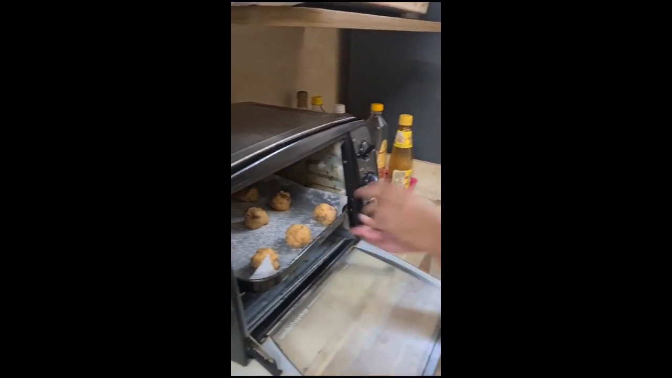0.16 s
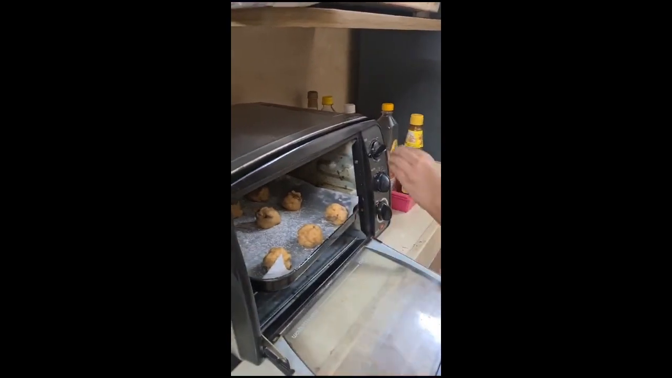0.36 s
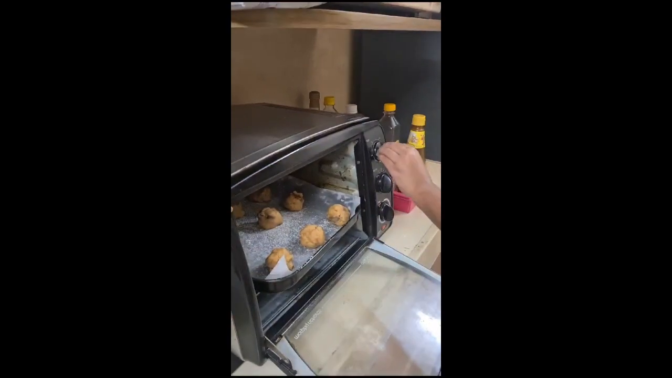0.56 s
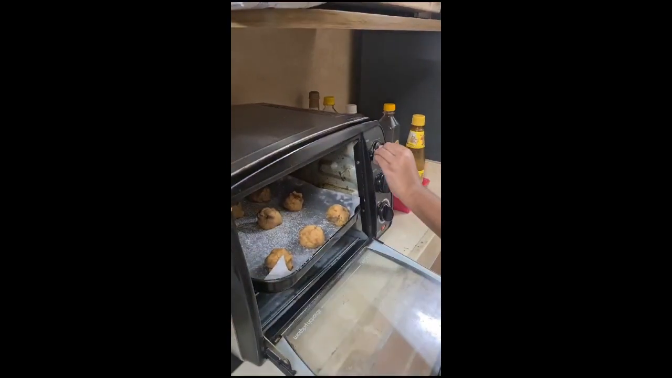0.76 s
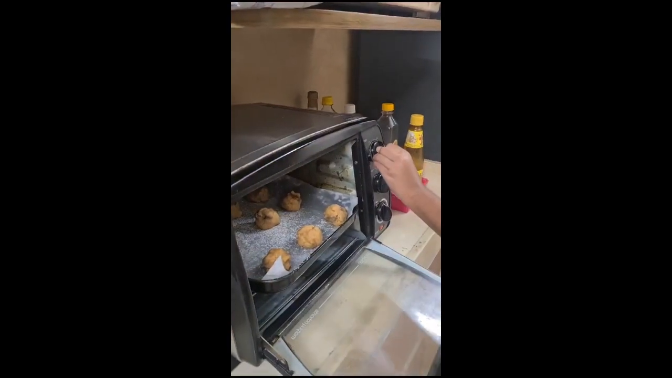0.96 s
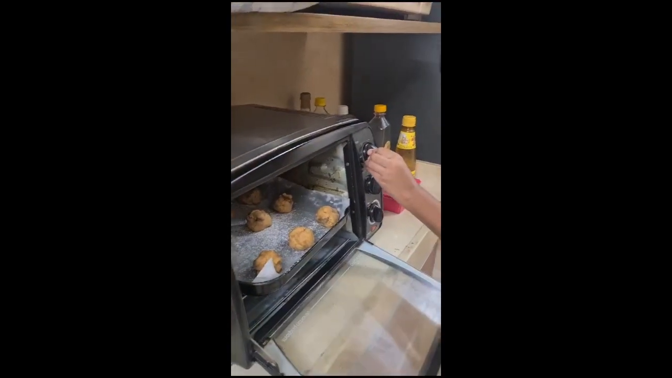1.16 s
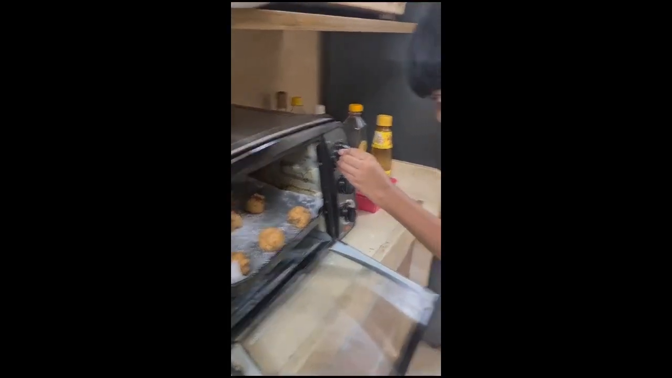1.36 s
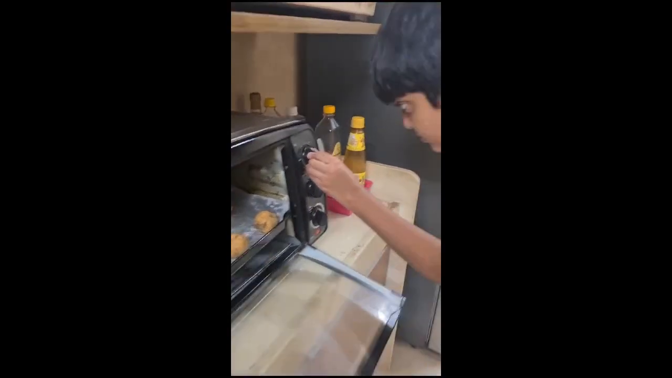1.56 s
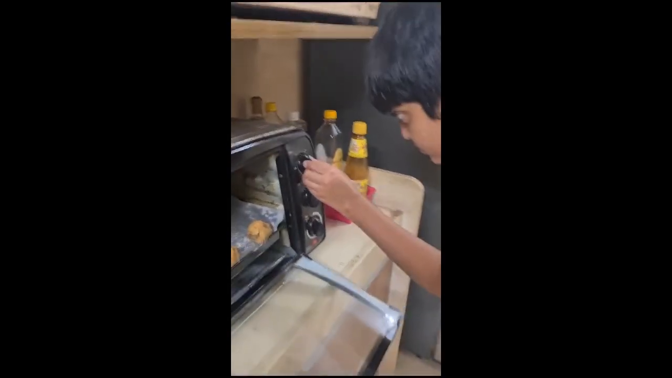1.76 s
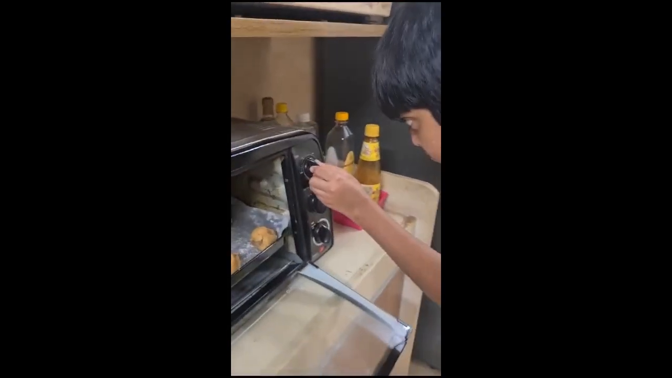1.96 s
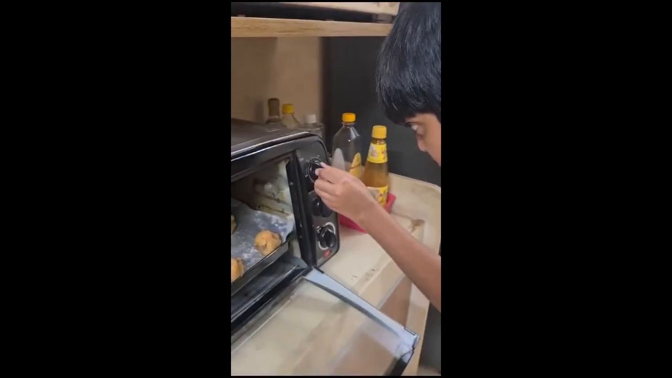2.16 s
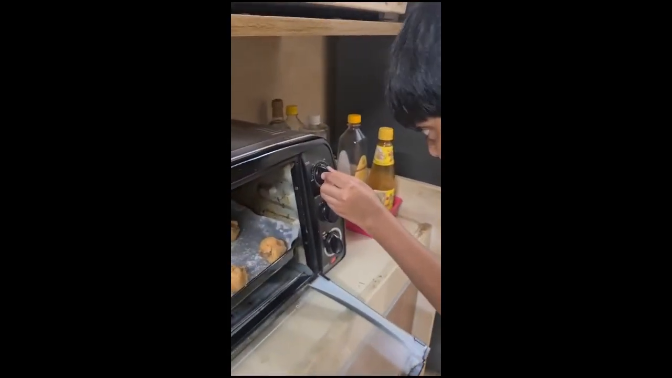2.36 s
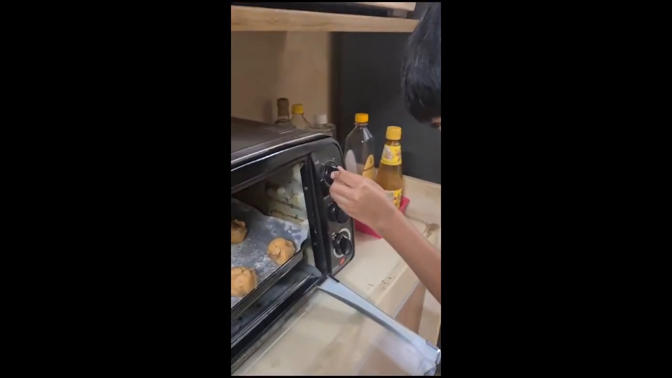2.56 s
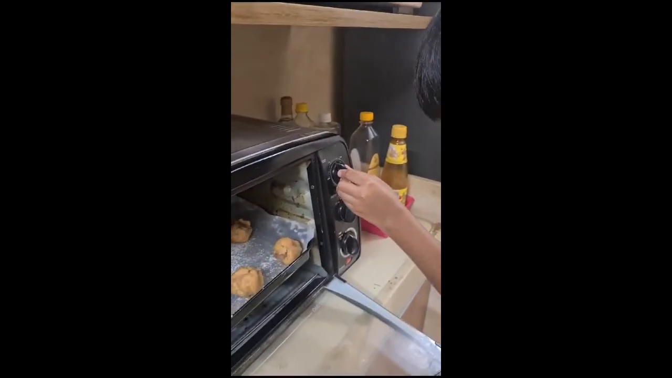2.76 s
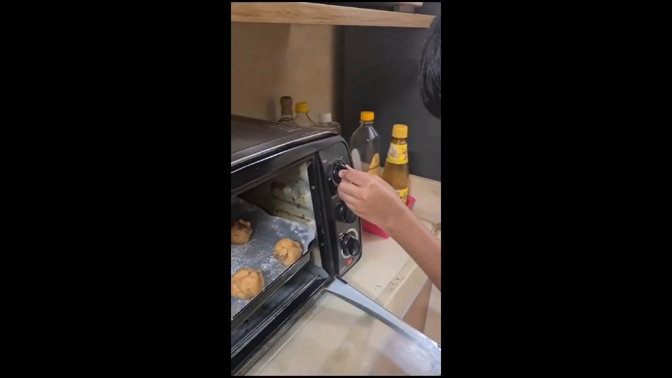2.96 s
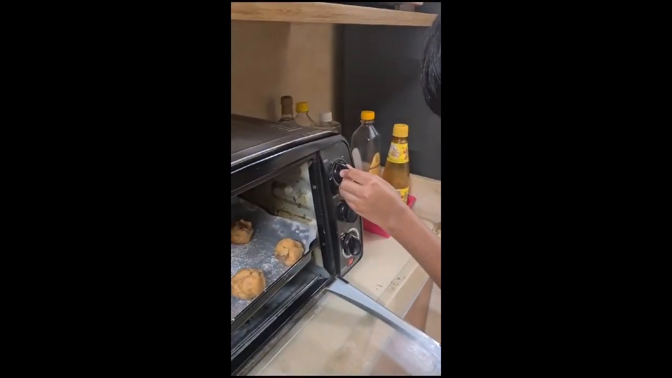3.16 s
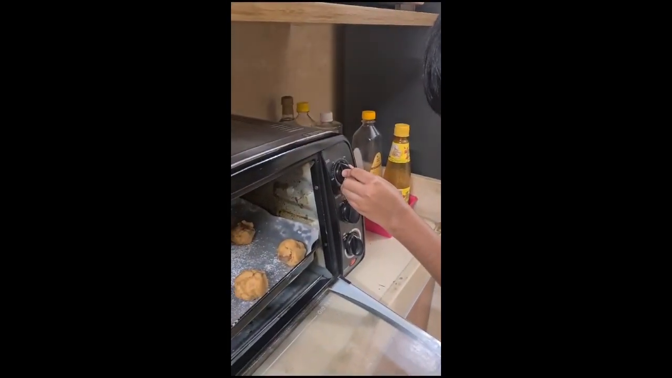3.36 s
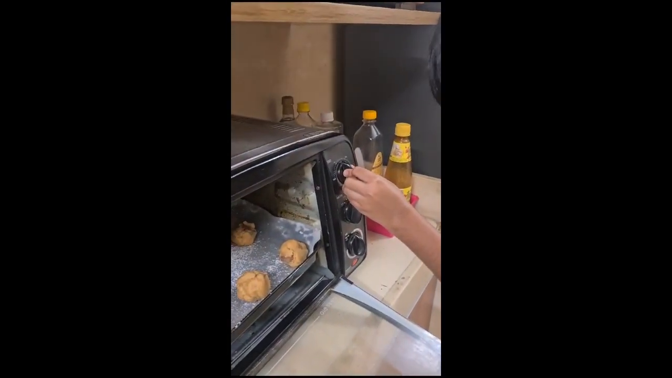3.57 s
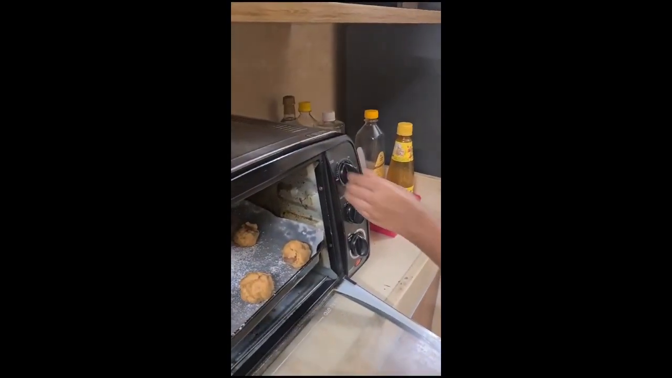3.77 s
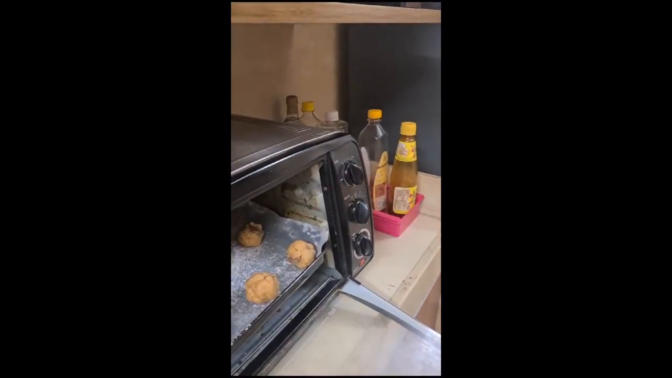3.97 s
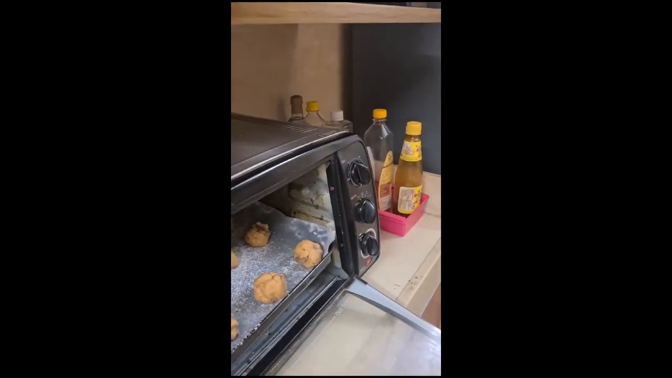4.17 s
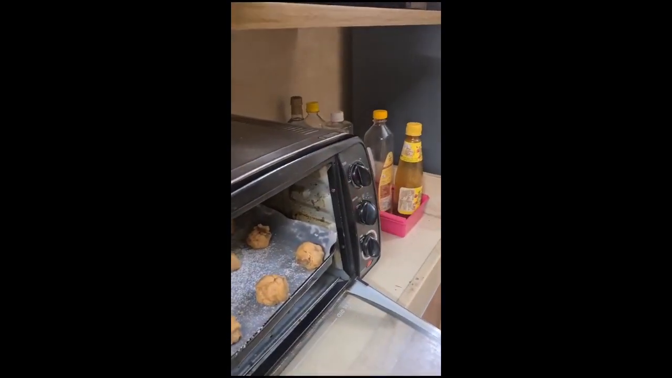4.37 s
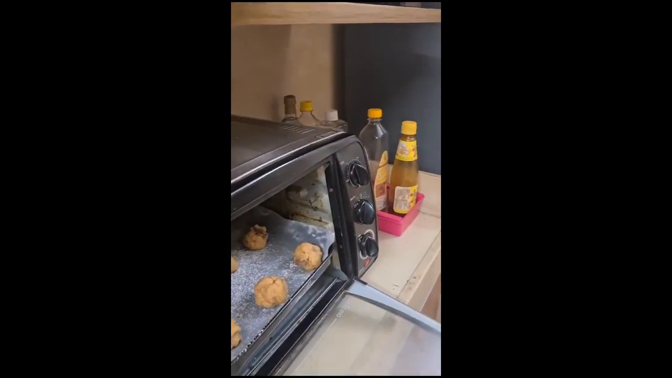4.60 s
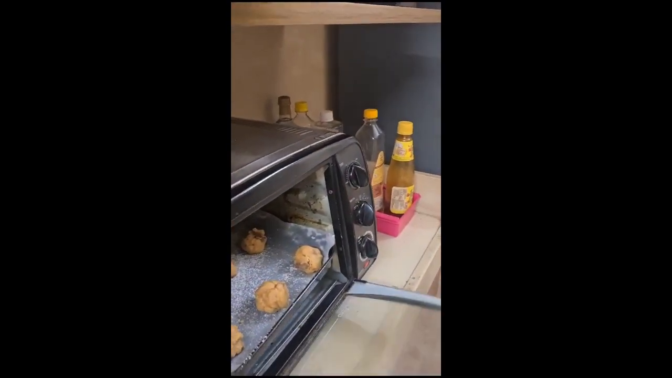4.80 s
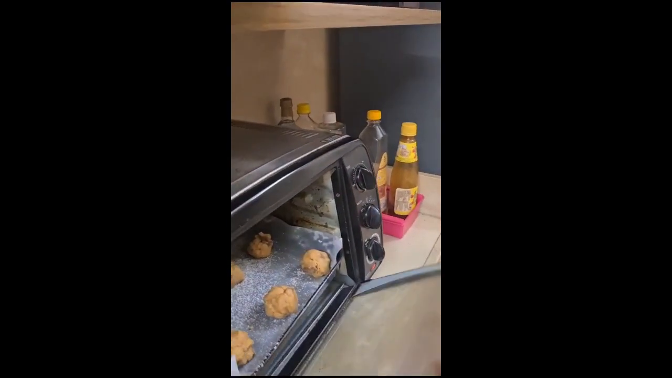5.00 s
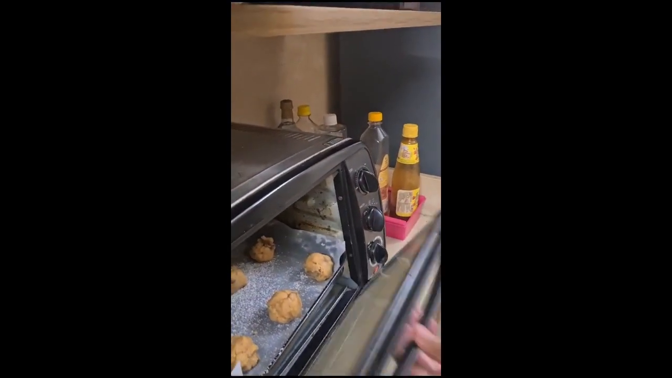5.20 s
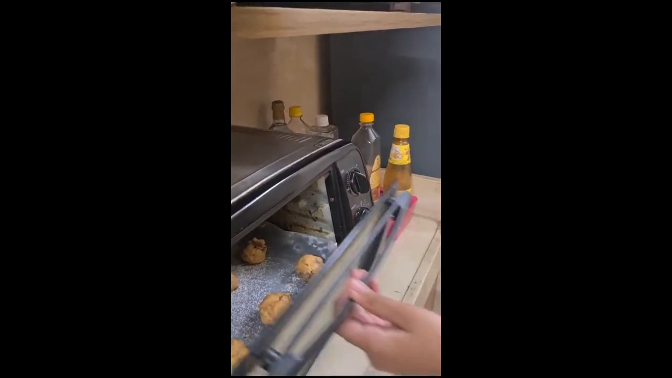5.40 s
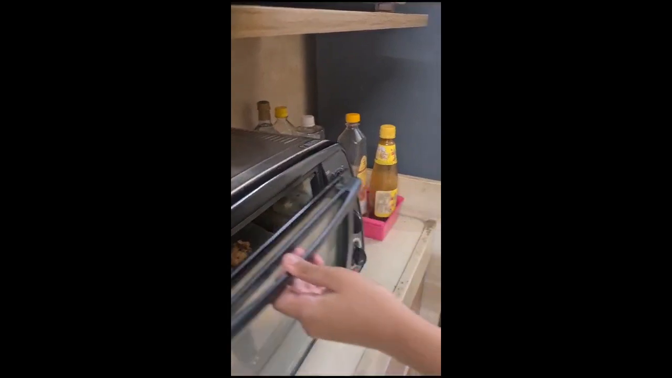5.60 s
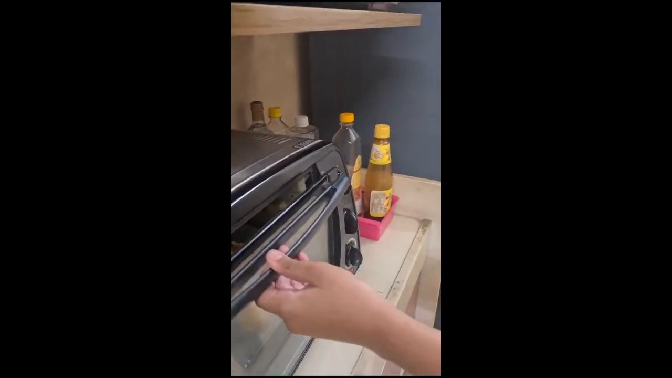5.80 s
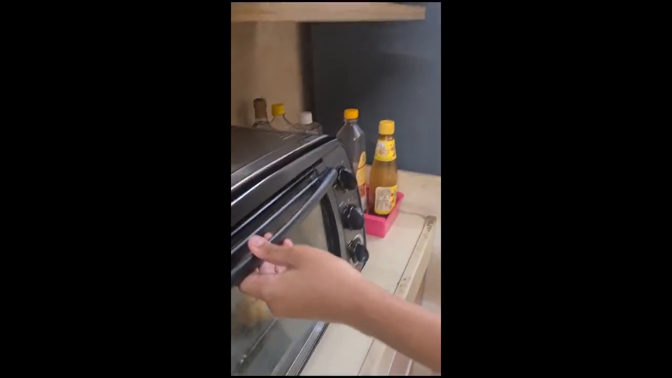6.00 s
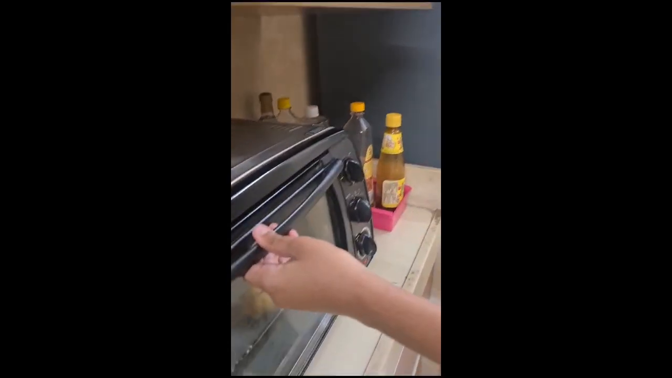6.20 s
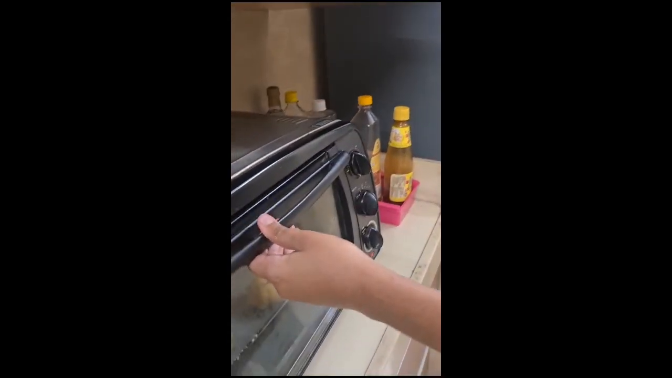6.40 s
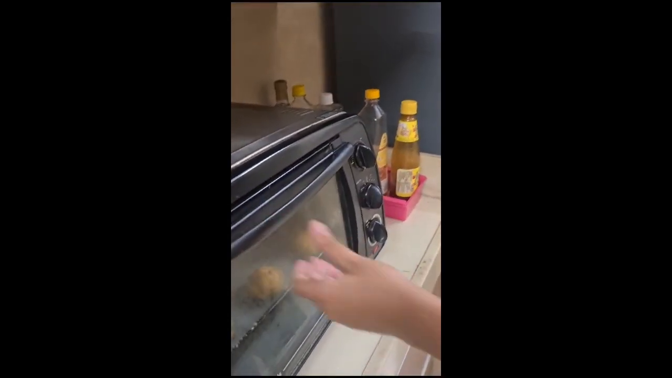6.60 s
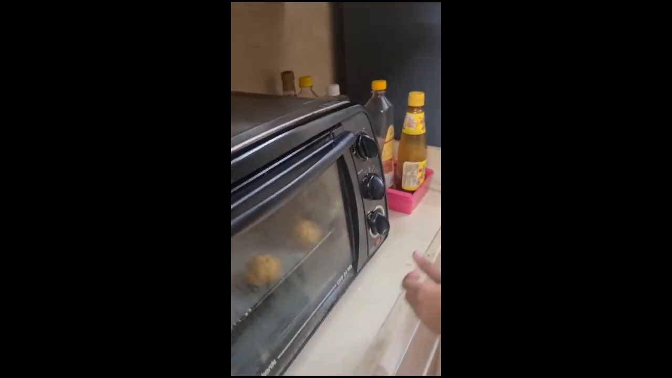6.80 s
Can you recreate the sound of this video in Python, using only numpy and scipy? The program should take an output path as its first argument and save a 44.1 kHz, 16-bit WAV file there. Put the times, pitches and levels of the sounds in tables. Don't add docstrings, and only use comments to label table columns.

```python
import sys
import numpy as np
from scipy import signal
from scipy.fft import rfft, irfft, next_fast_len
from scipy.io import wavfile
from scipy.ndimage import uniform_filter1d

SR = 44100
rng = np.random.default_rng(int(sys.argv[2]) if len(sys.argv) > 2 else 0)


def store_pcm(level_fs):
    pcm = np.round(np.clip(level_fs, -1, 1) * 32767).astype(np.int16)
    wavfile.write(sys.argv[1], SR, np.atleast_2d(pcm).T)


def volts_from_db(level):
    exponent = np.asarray(level, float) / 20
    return 10 ** exponent


N = 302085
TIME = np.arange(N) / SR
SIZE = next_fast_len(N + 4000)
HZ = np.fft.rfftfreq(SIZE, 1 / SR) + 1
PORT_LAG = 17

# start_s, peak_db, tilt_db_per_octave, t60_s, favoured_hz
TAPS = [(0.301, -43, 0, 0.055, 4930), (0.306, -42, 2, 0.15, 3160), (.315, -39.5, -7.5, 0.034, 2840),
        (0.479, -58, 4.5, 0.027, 4500), (.482, -51.5, -1, 0.27, 1270), (.63, -53, -8, 0.068, 5000),
        (1.469, -49.5, -4, 0.1, 920), (3.699, -51, -9, 0.09, 1110), (3.863, -56.5, 2, 0.047, 1460),
        (4.41, -33.5, 2.5, 0.14, 4520), (4.418, -35, 6.5, 0.025, 10500), (4.502, -31, 8, 0.0091, 7200),
        (5.357, -44.5, -5, 0.044, 6940), (6.464, -63, -4, 0.096, 3000), (6.744, -51, 5, 0.025, 3400),
        (.304, -44.5, 4, 0.31, 10400), (4.5025, -47, -4, .015, 13500)]
CLACKS = [
    (5.511, -14.5, 5, 0.05, 1280),
    (5.522, -17, -3.5, 0.057, 3050),
    (5.637, -29.5, 2.5, 0.059, 11100),
    (5.892, -38.5, -3.5, 0.74, 2280),
    (5.981, -31, -5, 0.079, 4200),
    (5.986, -17.5, -1, 0.14, 1240),
    (5.988, -32.5, 10, 0.04, 9600),
    (6.035, -32, -4, 0.12, 1240),
    (6.1, -40.5, -6, 0.048, 1350),
]
# time_s, friction_db
LIFTING = [
    (4.6, -87),
    (4.69, -72),
    (4.79, -79),
    (5.06, -75),
    (5.12, -70.5),
    (5.3, -78.5),
    (5.365, -72),
    (5.47, -77.5),
    (5.5, -64),
]


def rms_one(x):
    return x / np.sqrt(np.mean(x ** 2) + 1e-20)


def in_time(rows):
    return np.interp(TIME, *np.transpose(rows), left=-150, right=-150)


def at_hz(points, hz):
    table = np.array(points)
    return np.interp(np.log(hz), np.log(table[:, 0]), table[:, 1])


def filtered(x, response):
    padded = np.concatenate([x[..., 2000:0:-1], x, x[..., :-2001:-1]], axis=-1)
    return irfft(rfft(padded, SIZE) * response, SIZE)[..., 2000:N + 2000]


def drift(rate):
    r = np.exp(-80 * np.pi * rate / SR)
    noise = rng.standard_normal(N // 40 + 2002)
    slow = signal.lfilter([1], [1, -2 * r, r * r], noise)[2000:]
    return np.interp(np.arange(N) / 40, np.arange(len(slow)), rms_one(slow))


def ring(clicks, hz, t60):
    r, w = volts_from_db(-60 / (t60 * SR)), 2 * np.pi * hz / SR
    return signal.lfilter([0, np.sin(w)], [1, -2 * r * np.cos(w), r * r], clicks + 1e-18)


def stroke(start, held, db, attack, fade_db_per_s):
    age = TIME - start
    fading_db = db - fade_db_per_s * np.maximum(age - held, 0)
    return volts_from_db(2 * fading_db) * np.clip(1 + age / attack, 0, 1) ** 4


def swings(rows):
    out, age = np.zeros(N + SR), TIME[:SR // 2]
    for s, db, hz, t60 in rows:
        level = volts_from_db(db + 3 - 60 * age / t60)
        build = 1 - np.exp(-age * hz * 3)
        close = np.clip(10 - 20 * age, 0, 1)
        out[int(s * SR):][:len(age)] -= level * build * np.sin(2 * np.pi * hz * age) * close
    return out[:N]


def struck(modes, blows, level_db, shorten):
    out, touches = np.zeros(N), np.arange(12)
    for hz, mode_db, t60 in modes:
        clicks = np.zeros(N)
        chances = rng.standard_normal((len(blows), 12))
        for (s, db, *_), chance in zip(blows, chances):
            touch_db = db + mode_db + level_db - 2.56 * touches
            clicks[int(s * SR) + 13 * touches ** 2] += volts_from_db(touch_db) * chance / 2
        out += ring(clicks, hz, min(t60, .45) * shorten)
    return out


def banded(gain_at, count):
    # pitch_hz, likeness (0 to 1)
    likeness = [(40, 0.41), (150, 0.6), (400, 0.55), (1000, 0.022), (4000, 0.044), (12000, 0.081)]
    out, edges = np.zeros((2, N)), 22 * 2 ** np.arange(0, 9.6, 1 / 3)[-count:]
    white = rng.standard_normal((2, 2, N + 4000))
    for k, (low, high) in enumerate(zip(edges, edges[1:])):
        hz = np.sqrt(low * high)
        alike = np.clip(at_hz(likeness, hz), 0, 1)
        common, apart = np.sqrt(1 + alike), np.sqrt(1 - alike)
        pair = np.array([[common, apart], [common, -apart]]) @ white[k % 2]
        band = signal.butter(2, [low, high], "band", fs=SR, output="sos")
        out += gain_at(hz) * signal.sosfilt(band, pair)[:, 4000:]
    return out


def far_ports(x):
    # pitch_hz, left_minus_right_db
    balance = [(28, -11.5), (60, -13.5), (150, -2.5), (380, 0.5), (950, 3), (2380, 9), (5980, 5.5),
               (15000, -3)]
    colour = volts_from_db(at_hz(balance, HZ) / 2 * np.array([[1], [-1]]))
    lag = np.exp(-2j * np.pi * HZ * np.array([[0], [PORT_LAG]]) / SR)
    return filtered(x, colour * lag)


def room_tone():
    # pitch_hz, level_db (per Hz)
    colour = [(22, -5), (46, 1), (66, -6.5), (102, -4), (200, -16), (350, -20), (450, -26), (950, -28.5),
              (1500, -39.5), (2400, -50), (5000, -54.5), (6200, -52.5), (9000, -58), (15500, -62)]
    # pitch_hz, width_hz, level_db
    hum = [
        (100.04, 3.5, -54),
        (151.6, 19.3, -58),
        (249.2, 3.5, -64.5),
        (350, 8.5, -65),
        (409.4, 48, -69.5),
        (1000, 6.9, -81),
        (1863, 81, -86.5),
        (6060, 91, -88),
    ]
    # time_s, deep_rumble_db
    hand = [(0, 3), (.3, 0), (1.0, 3), (1.8, 1.5), (2.8, -3), (3.3, 1), (3.65, -7.5), (4.4, -1.5),
            (5.6, 3.5), (5.95, 5), (6.85, 2.5)]
    # start_s, level_db (over the room tone), fading_db_per_s
    booms = [
        (0.308, 8, 36),
        (4.4, 6.5, 10),
        (5.535, 15, 47),
        (5.8, 2.5, 11),
        (5.985, 17, 75),
        (6.2, 8, 11.5),
    ]
    deep = in_time(hand)
    boom = 10 * np.log10(1 + sum(stroke(s, 0, db, .022, fade) for s, db, fade in booms))

    def gain_at(hz):
        swell = deep if hz < 70 else boom * np.clip(np.log2(900 / hz) / 2, 0, 1)
        return volts_from_db(at_hz(colour, hz) + swell + 1.73 * drift(11.2))

    tone = banded(gain_at, count=29)
    tone *= volts_from_db(-46.5 - 2.0) / np.std(tone[:, 2 * SR:4 * SR])
    drone = sum(volts_from_db(db) * rms_one(ring(rng.standard_normal(N), hz, 3.7 / width)) for hz, width, db in hum)
    return far_ports(tone + drone)


def grip():
    # start_s, level_db, pitch_hz
    ticks = [
        (.916, -35, 402),
        (1.459, -38, 804),
        (1.463, -27.5, 350),
        (2.943, -44.5, 670),
        (3.7, -36, 605),
        (6.035, -16.5, 493),
        (6.212, -41, 580),
        (6.445, -41.5, 350),
    ]
    out, touch = np.zeros(N), np.pad(np.hanning(24) / 10, (0, 2000))
    for s, db, hz in ticks:
        out[int(s * SR):][:len(touch)] += volts_from_db(db) * ring(touch, hz, 0.0064)
    return out * volts_from_db([[-8], [3]])


def drag():
    # pitch_hz, width_hz, level_db
    sole = [(293.7, 14, 9), (397.5, 21, 14), (515, 29, 12.5), (610, 81, 11.5), (736, 22, 10.5),
            (775, 510, 14.5), (1110, 23, -7), (1280, 73, -13), (1720, 49, -51.5)]
    # start_s, held_s, level_db
    scuffs = [
        (4.413, 0.11, -34.5),
        (4.56, 0.059, -46),
        (4.676, 0.026, -73),
    ]
    effort_db = in_time(LIFTING)
    power = sum(stroke(*row, attack=0.022, fade_db_per_s=305) for row in scuffs)
    power += (effort_db > -120) * volts_from_db(2 * (-57 + 0.19 * (effort_db + 82.0)))
    grit = rng.standard_normal(N) * volts_from_db(3.0 * drift(70))
    hollow = sum(volts_from_db(db) * rms_one(ring(grit, hz, 7.3 / max(width, 25))) for hz, width, db in sole)
    return volts_from_db(-5.0) * np.sqrt(power) * rms_one(hollow)


def rubs():
    # start_s, held_s, level_db, sheen_db, weight_db
    fingers = [
        (.28, .02, -73.5, -9, 2),
        (1.235, 0.086, -73.5, -13, 11),
        (1.484, 0.044, -62, -7.5, 7.5),
        (1.7, 0.032, -71, -10.5, 11),
        (1.795, 0.066, -66.5, -14, 1),
        (2.024, 0.043, -61, -6.5, -9),
        (1.99, .03, -73.5, 2, -12),
    ]
    palm = [
        (4.411, 0.0083, -48.5, -7.5, -6),
        (4.43, 0.069, -48.5, -17, 4),
        (6.744, 0.026, -61, -18, 0.5),
    ]
    # time_s, friction_db
    shutting = [
        (5.66, -73),
        (5.75, -67),
        (5.87, -59.5),
        (5.9, -53.5),
        (5.945, -58),
        (6.15, -80),
        (6.38, -78),
        (6.46, -76),
        (6.73, -84),
    ]
    # (edge dB, sheen dB, weight dB)
    layers = [(stroke(s, held, db, .03, 200), (-6, *tint)) for s, held, db, *tint in fingers]
    layers += [(stroke(s, held, db, 0.024, 182), (-1, *tint)) for s, held, db, *tint in palm]
    grain = volts_from_db(0.5 + 0.56 * drift(90))
    rattle_db = 2 * drift(42)
    layers += [(volts_from_db(2 * in_time(LIFTING)), (-8, -13, 8.1))]
    layers += [(volts_from_db(2 * (in_time(shutting) + rattle_db)), (-9.5, -16.5, 8.6))]
    powers, tints_db = map(np.array, zip(*layers))
    octaves = [-3, -1.5, .3, 1.2, 1.9, 2.4, 3.0, 3.3, 4]
    edge = [0, 0, 0, 0, 0, 1, 1, 0, 0]
    sheen = [0, 0, 0, 0, 0, 0, .3, 1, 1]
    weight = [0, 1, 1, 0, 0, 0, 0, 0, 0]

    def gain_at(hz):
        shares = [np.interp(np.log2(hz / 1000), octaves, share) for share in (edge, sheen, weight)]
        power = volts_from_db(2 * (tints_db + (-2.0, 2.5, 3)) @ shares) @ powers
        return grain * np.sqrt(power) * volts_from_db(-30 * (hz < 160) - 2.3 * (hz > 11500))
    return gain_at


def clatter(hz):
    # pitch_hz, level_db (per Hz)
    clang = [(88, -36), (150, -9.5), (420, -5.5), (500, -5.5), (930, -6), (1040, -13), (3980, -22),
             (7560, -35.5), (9360, -49), (13800, -35.5), (15500, -54)]
    # pitch_hz, t60_s
    room_t60 = [(150, 0.6), (1000, 0.48), (5000, 0.36), (14000, 0.31)]
    power, age = np.zeros(N + SR), TIME[:SR // 3]
    rise = 1 - np.exp(-age * hz / 4)
    tail = volts_from_db(-15.5 - 120 * age / at_hz(room_t60, hz))
    tail += volts_from_db(15.0 - 120 * age / 0.01)
    for s, db, tilt, t60, peak_hz in TAPS + CLACKS:
        favour_db = 11 * np.exp(-(np.log2(hz / peak_hz) / 0.37) ** 2)
        colour_db = tilt * np.log2(hz / 2000) + favour_db
        burst = volts_from_db(-120 * age / max(t60, .01))
        power[int(s * SR):][:len(age)] += volts_from_db(2 * (db + colour_db)) * rise * (burst + tail)
    return volts_from_db(at_hz(clang, hz) + 5.5) * np.sqrt(power[:N])


def pings():
    # start_s, peak_db, pitch_hz, t60_s
    rods = [(.305, -60, 2710, 0.036), (.312, -58, 1372, 0.11), (.318, -55, 3240, 0.081),
            (.316, -55, 2000, .05), (.316, -57, 4000, .04), (.335, -59, 2470, 0.036),
            (.353, -49, 774, 0.13), (.334, -59, 2100, 0.067), (1.4745, -47, 734, 0.066),
            (1.475, -52, 1520, 0.032), (1.481, -62, 1770, 0.039), (1.485, -51, 1143, 0.13),
            (1.493, -54, 860, 0.13), (4.406, -49, 2720, 0.069), (4.407, -48, 4670, .05),
            (4.417, -49, 2480, .06), (4.418, -44.5, 1055, 0.18), (4.422, -46, 1206, .1),
            (4.428, -40, 296, 0.1), (4.419, -40.5, 534, 0.15), (4.445, -39, 894, 0.087),
            (4.478, -41, 756, .06), (4.482, -39, 308, .1), (4.501, -36, 783, 0.064), (4.527, -38, 774, .08),
            (4.575, -44, 760, 0.11), (4.46, -50, 2800, .08), (4.465, -40.5, 912, .12),
            (4.482, -42, 837, 0.095), (4.502, -43, 4430, 0.026), (4.503, -46, 7800, .03),
            (4.505, -45, 1320, 0.053), (5.511, -27, 1450, 0.06), (5.518, -30, 1330, 0.053),
            (5.514, -28, 503, .09), (5.513, -37.5, 2913, 0.073), (5.516, -33, 3580, 0.061),
            (5.524, -41, 1740, 0.092), (5.513, -33, 1055, .12), (5.552, -31.5, 482, 0.11),
            (5.897, -51.5, 2870, .05), (5.896, -49.5, 2020, 0.033), (5.856, -59, 2330, .04),
            (5.638, -54, 1055, .1), (5.908, -44, 1480, 0.057), (5.987, -32.5, 2030, 0.03),
            (6.018, -49, 1400, 0.065), (6.035, -38, 710, 0.066), (6.05, -49, 1430, 0.099),
            (6.06, -48, 1863, 0.071), (6.082, -45, 1196, 0.086), (6.146, -52.5, 1405, 0.087),
            (6.175, -53, 1460, 0.052)]
    return swings(rods)


def tray():
    # pitch_hz, level_db, t60_s
    modes = [(177, -18, 0.97), (253, -22, 5.0), (570, -16, 3.8), (770, -6, 5.0), (2000, -12, 0.19),
             (3550, -21, 0.17), (4060, -11, 0.18), (6030, -28, 0.52)]
    return struck(modes, TAPS[1:4], level_db=0.0, shorten=0.24)


def hinge():
    # start_s, length_s, pitch_hz, level_db
    squeaks = [(0.476, 0.054, 1380, -65), (.48, .03, 3850, -75), (1.703, 0.037, 2140, -76),
               (1.79, 0.042, 2800, -73), (1.81, .03, 4000, -75), (4.945, 0.072, 2970, -69),
               (5.094, 0.025, 4550, -72), (5.094, .025, 3950, -73), (5.1, .025, 2850, -74),
               (5.13, 0.028, 2600, -75), (4.62, .3, 1850, -76), (5.17, 0.1, 4900, -82),
               (5.29, .07, 1850, -73), (5.352, 0.03, 1470, -62), (5.354, 0.02, 2600, -67),
               (5.355, .02, 6980, -76), (5.36, .02, 4900, -77), (5.41, .02, 2850, -73),
               (5.788, 0.0075, 3200, -58), (5.84, .03, 3050, -62), (6.151, 0.079, 2670, -75),
               (6.243, .2, 1850, -73)]
    out = np.zeros(N + SR)
    for s, length, hz, db in squeaks:
        age = TIME[:SR] / length
        whistle = rms_one(ring(rng.standard_normal(SR), hz, 0.018))
        out[int(s * SR):][:SR] += volts_from_db(db + 0.5) * age * np.exp(1 - age * 2) * whistle
    return out[:N]


def spring():
    # pitch_hz, level_db, t60_s
    modes = [(512, -17, 0.46), (1055, -10, 0.29), (1240, -14, 0.2), (1280, -9.5, 0.12), (1436, -8.5, 0.11),
             (1580, -22, 0.15), (2086, -14, 0.2), (2493, -14, 0.15), (2990, -11, 0.14), (3820, -13, 0.096),
             (4080, -16.5, 0.084), (4200, -14, .12), (5560, -18.5, 0.2), (7180, -7, 0.04)]
    return struck(modes, CLACKS[:2], level_db=-6.5, shorten=0.4)


def door():
    # pitch_hz, level_db, t60_s
    modes = [(418, -20, .2), (725, -0.5, 0.3), (930, -10.5, 0.25), (1215, -2, 0.27), (1347, 9, 0.098),
             (1435, -6, 0.4), (1790, -24, 0.16), (2390, -6, 0.088), (2670, -8.5, 0.2), (3900, -11, 0.11),
             (5830, -30.5, .2), (8220, -23, .2)]
    return struck(modes, CLACKS[4:], level_db=-9.5, shorten=0.8)


def thuds():
    # start_s, peak_db, pitch_hz, t60_s
    flexes = [(0.309, -40.5, 176.1, 0.99), (.33, -40.5, 333, 0.052), (3.7, -48, 378, .12),
              (3.71, -46.5, 285, 0.62), (4.429, -42, 258.5, 0.52), (4.64, -45.5, 276.3, 0.62),
              (5.5105, -25.5, 110, 0.2), (5.5275, -26, 112, .1), (5.522, -31.5, 199, .15),
              (5.538, -30.5, 288.5, 0.14), (5.77, -30.5, 69.7, 0.29), (5.834, -31, 91.3, 0.43),
              (5.898, -35, 125, 1), (5.9655, -19, 120.9, 0.22), (5.9825, -23, 111, 0.088),
              (5.992, -18.5, 103, 0.093), (5.994, -23.5, 146.3, 0.082), (6.004, -21.5, 100.7, .08),
              (6.014, -32.5, 75, .2), (6.0415, -13.5, 100.5, 0.035), (6.0515, -24, 100.7, 0.085),
              (6.075, -31.5, 117, .12), (6.0625, -19, 106, 0.036), (6.057, -26, 186, 0.072),
              (6.09, -38, 178.4, 0.3), (6.112, -31, 72.6, 0.17), (6.025, -33, 300, .06),
              (6.07, -41, 420, 0.13), (6.215, -35.5, 96.4, 0.24), (6.252, -24.5, 96, 0.055),
              (6.44, -40.5, 62.3, 1)]
    return swings(flexes) * volts_from_db([[-1.5], [.4]])


def echoed(x):
    # delay_s, level_db
    echoes = [(.0023, -29), (.0047, -17), (.0073, -15), (.0119, -20.5), (.018, -14.5)]
    response = 1
    for k, (s, db) in enumerate(echoes):
        response = response + (-1) ** k * volts_from_db(db) * np.exp(-2j * np.pi * HZ * s)
    return filtered(x, response)


def near_ports(x):
    # pitch_hz, level_db
    left_port = [(60, -11.5), (150, 1), (400, 0), (750, 1), (1250, 5.5), (2400, 8), (4400, 7), (8300, 13),
                 (9400, 8.5), (15000, 3)]
    # pitch_hz, level_db
    open_loss = [(60, 17), (110, 3), (200, -2.5), (500, 2.5), (1100, -8.5), (2400, -9), (7800, -12.5),
                 (9000, 2), (10400, 0), (12000, -14), (15500, -12)]
    # pitch_hz, level_db
    dull_loss = [(60, 16), (110, 3.5), (200, 0.5), (500, -2.5), (1200, -15), (3000, -26), (5500, -35),
                 (7200, -43), (8300, -43), (9000, -17.5), (9700, -7), (10500, -19), (12500, -25),
                 (15500, -16)]
    # time_s, level_db
    open_path = [
        (0, 0),
        (4.48, -6),
        (4.5, -32),
        (5.5, -11),
        (5.62, -18),
        (5.85, -26.5),
        (5.975, -25),
        (5.985, -3.5),
        (6.035, -32),
        (6.85, -27),
    ]
    # time_s, level_db (more at the right port)
    turn = [
        (0, -2),
        (1.2, 0.5),
        (2.2, 0.5),
        (4.3, -2.5),
        (5.5, -1.5),
        (5.97, -1),
        (6.03, 2),
        (6.06, 2.5),
        (6.3, 3.5),
        (6.85, 0.5),
    ]
    left, right = filtered(x, volts_from_db(at_hz(left_port, HZ)))
    lag = np.exp(-2j * np.pi * HZ * PORT_LAG / SR)
    share = np.clip(volts_from_db(in_time(open_path)), 0, 1)
    in_open = filtered(right, volts_from_db(at_hz(open_loss, HZ)) * lag)
    in_dull = filtered(right, volts_from_db(at_hz(dull_loss, HZ)) * lag)
    return np.array([left, (share * in_open + (1 - share) * in_dull) * volts_from_db(in_time(turn))])


def scene():
    rub = rubs()
    hiss = banded(lambda hz: np.hypot(rub(hz), clatter(hz)), count=22)
    rings = spring() + door() + tray()
    near = echoed(hiss + rings + pings() + drag()) + thuds() + hinge()
    return room_tone() + near_ports(near) + grip()


def thinned(x):
    # port, until_s, low_hz, high_hz, below_db
    quiet_gaps = [
        (0, 4.38, 6750, 8250, -67),
        (1, 6.85, 6500, 8400, -72),
        (0, 6.85, 14700, 16000, -92),
        (1, 6.85, 14700, 16000, -92),
    ]
    # from_s, to_s, low_hz, high_hz, cut_db
    busy_gaps = [(.3, .45, 11200, 15700, -4), (.34, .45, 15000, 15700, -15), (4.45, 4.49, 8750, 11500, -7),
                 (4.49, 5.98, 8750, 15700, -7.5), (4.51, 4.7, 15200, 15700, -15),
                 (5.52, 5.63, 14700, 15700, -14), (4.5, 4.72, 8750, 10500, -22), (6.0, 6.2, 8800, 9400, -8),
                 (4.72, 5.5, 8750, 9400, -12), (6.0, 6.2, 13800, 15700, -8), (6.16, 6.73, 8750, 15700, -8)]
    out = x.copy()
    gaps = [(port, 0, end, low, high, below, -14) for port, end, low, high, below in quiet_gaps]
    gaps += [(0, start, end, low, high, -38, cut) for start, end, low, high, cut in busy_gaps]
    for port, start, end, low_hz, high_hz, below_db, cut_db in gaps:
        span = slice(max(int((start - .1) * SR), 0), min(int((end + .1) * SR), N))
        length = span.stop - span.start
        size = next_fast_len(length)
        hz = np.fft.rfftfreq(size, 1 / SR)
        window = np.clip(np.minimum(hz - low_hz, high_hz - hz) / 200 + .5, 0, 1)
        band = irfft(rfft(out[port, span], size) * window, size)[:length]
        quiet = uniform_filter1d(band ** 2, size=512) < volts_from_db(2 * below_db)
        active = 1. * quiet * (TIME[span] > start) * (TIME[span] < end)
        out[port, span] -= (1 - volts_from_db(cut_db)) * band * uniform_filter1d(active, size=1024)
    return out


def low_pass(x):
    return signal.sosfilt(signal.butter(12, 16500, fs=SR, output="sos"), x)


def record(dry):
    below_top = np.clip((15750 - HZ) / 150, 0, 1)
    mix = thinned(filtered(dry, below_top))
    return low_pass(mix)


dry = scene()
out = record(dry)
store_pcm(out)
```